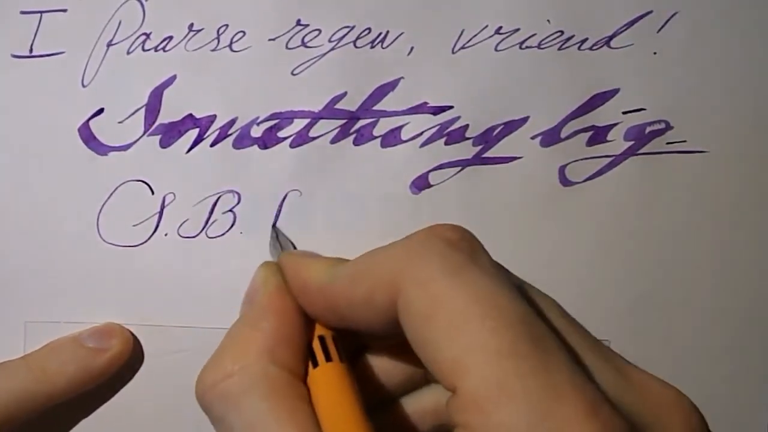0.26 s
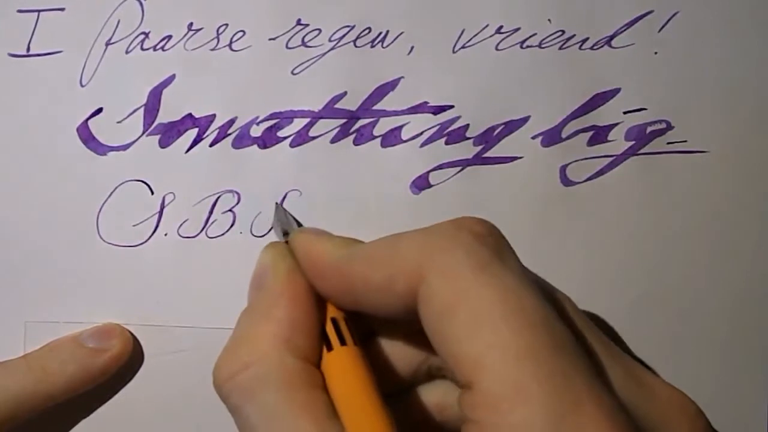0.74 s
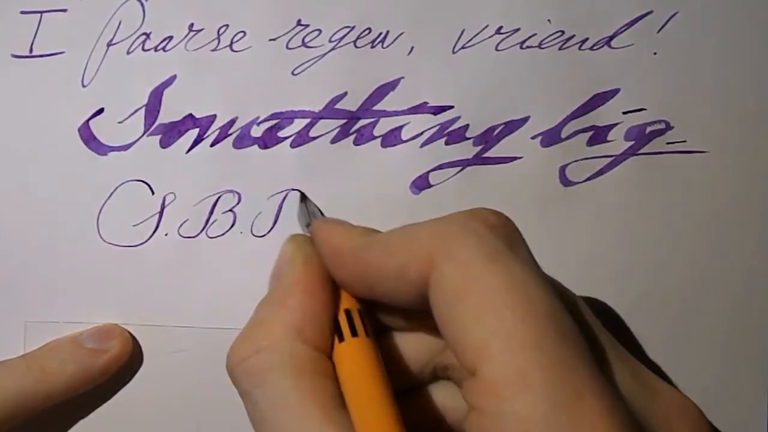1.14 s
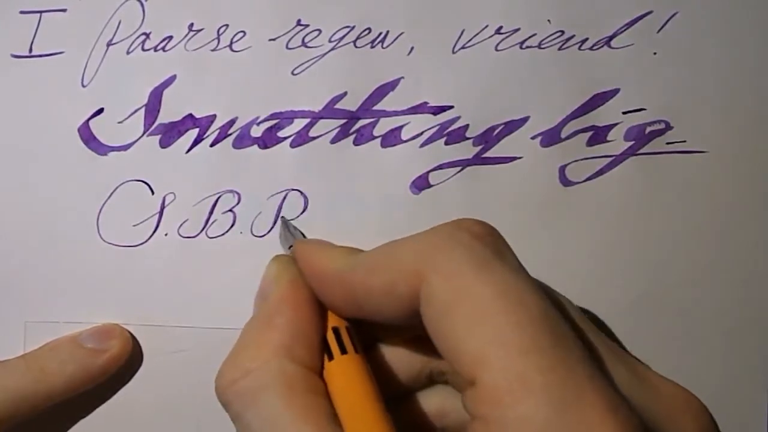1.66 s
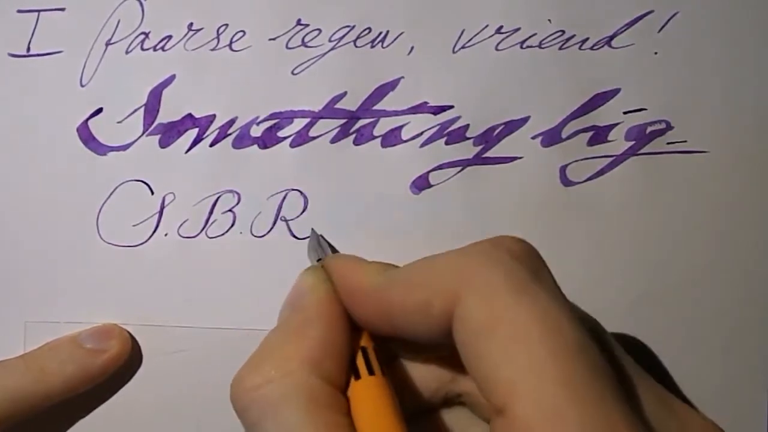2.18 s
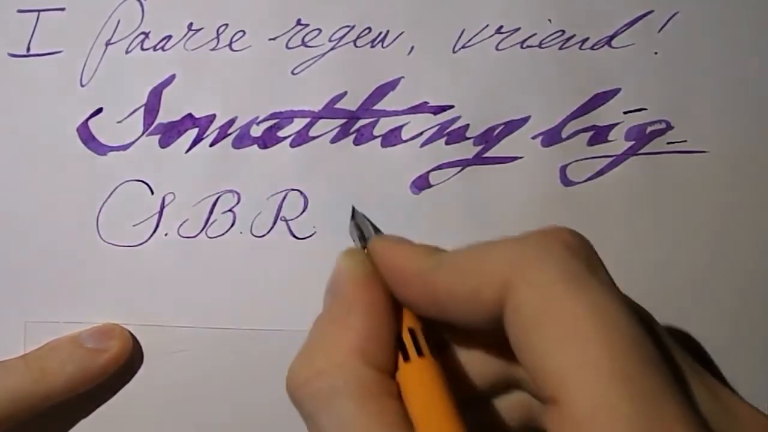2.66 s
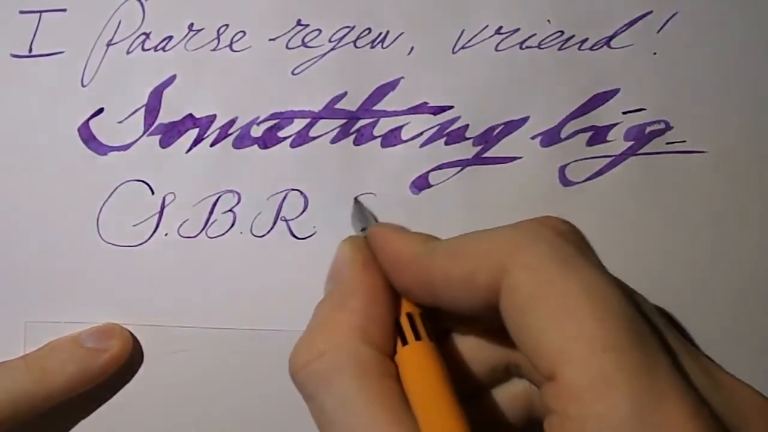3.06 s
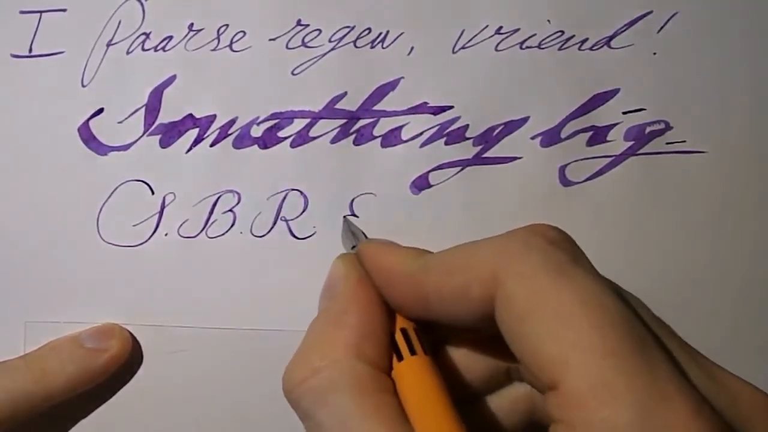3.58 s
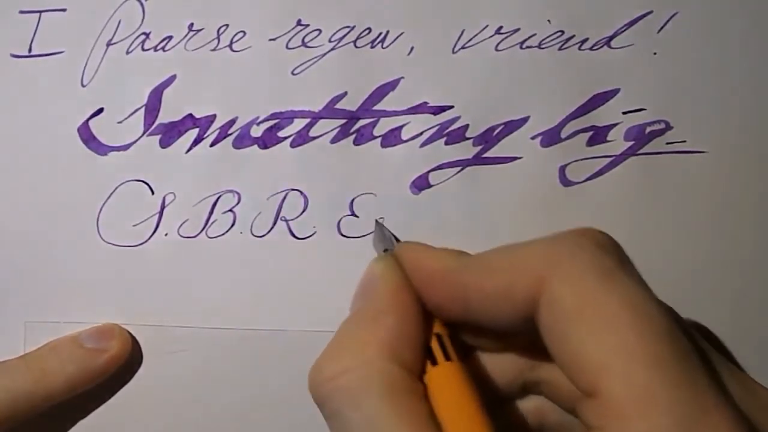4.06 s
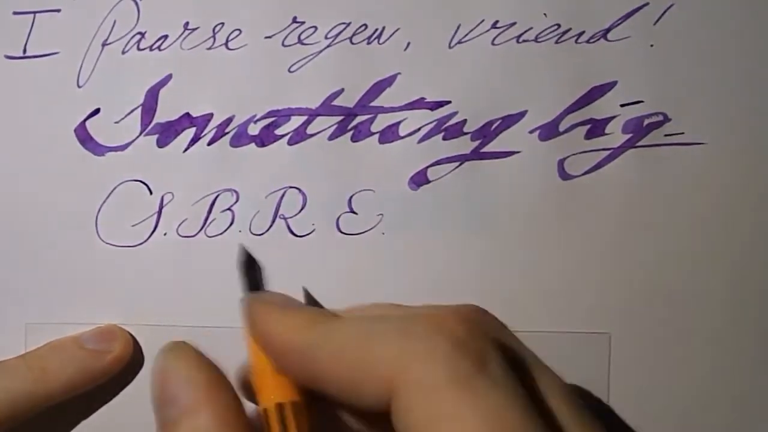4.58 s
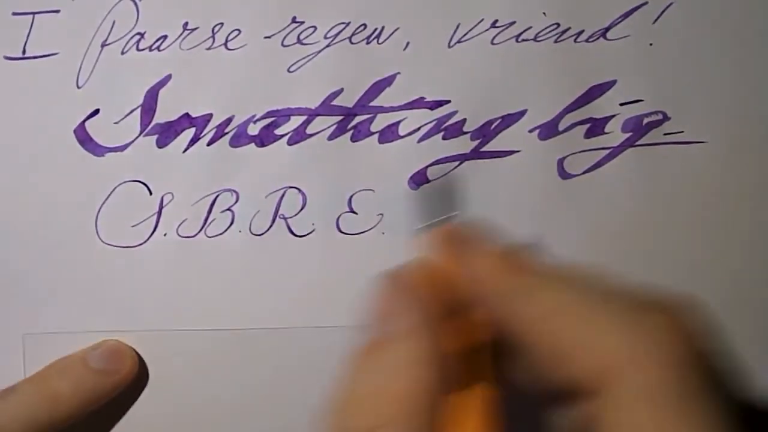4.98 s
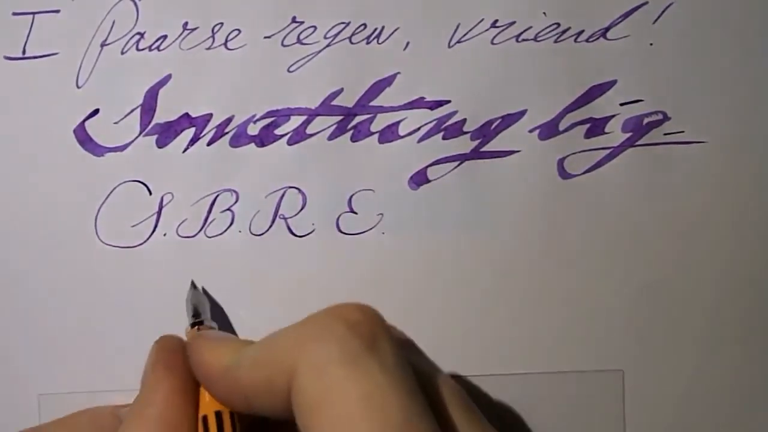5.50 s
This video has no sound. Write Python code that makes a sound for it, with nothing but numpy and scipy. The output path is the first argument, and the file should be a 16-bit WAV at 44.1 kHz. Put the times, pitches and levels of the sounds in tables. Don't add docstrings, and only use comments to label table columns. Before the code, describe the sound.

A quiet room, a small stereo microphone close to a wooden desk, with constant soft hiss, very faint mains hum and a thin high whine. From 0 to 0.6 s a steel nib scratches in overlapping strokes, with tiny ticks and a slight squeak, then a short brush. Quick scrapes return at 1.0-1.6 s and a slower one from 1.8 s, ending in a sharp, loud, woody knock at 2.07 s with a brief ring. A dull thump comes at 2.4 s among small lifting clicks, then a soft hand slide. Writing resumes at 3.0-4.1 s, light then firmer, with nib catches near 4.0. Clicks at 4.4 s lead to a strong knock at 4.57 s. Hand brushes and sheet slides with small squeaks fill 4.5-5.5 s, with a muffled bump at 5.03 s and a last dull thud at 5.57 s.

```python
import sys
import numpy as np
from scipy import signal
from scipy.fft import rfft, irfft, next_fast_len
from scipy.io import wavfile

SR = 44100
rng = np.random.default_rng(int(sys.argv[2]) if len(sys.argv) > 2 else 0)


def volts_from_db(level):
    exponent = np.asarray(level, float) / 20
    return 10 ** exponent


def int16_out(signal):
    q = np.round(np.clip(np.atleast_2d(signal).T, -1, 1) * 32767)
    wavfile.write(sys.argv[1], SR, q.astype(np.int16))


N = 253134
SIZE = next_fast_len(N + SR // 2)
HZ = np.maximum(np.arange(SIZE // 2 + 1) * SR / SIZE, 1)
SIDES = np.array([[1], [-1]])

# pitch_hz, width_hz, level_db
NIB_MODES = [(4500, 600, -2.5), (5500, 350, -1), (6000, 400, 1.5), (7200, 900, -10)]


def rms_one(x):
    return x / np.sqrt(np.mean(x ** 2) + 1e-20)


def at_hz(points, hz):
    points_hz, values = np.array(points)[:, :2].T
    return np.interp(np.log(hz), np.log(points_hz), values)


def shaped(x, gain):
    return irfft(rfft(x, SIZE) * gain, SIZE)[..., :N]


def drift(rate_hz):
    r = np.exp(-2 * np.pi * rate_hz / SR)
    wander = signal.lfilter([1], [1, -2 * r, r * r], rng.standard_normal(N + SR))
    return rms_one(wander[SR:])


def resonances(x, table):
    out = 0
    for k, (hz, width_hz, db) in enumerate(table):
        r = np.exp(-np.pi * width_hz / SR)
        poles = [1, -2 * r * np.cos(2 * np.pi * hz / SR), r * r]
        zeros = [(1 - r * r) / 2, 0, (r * r - 1) / 2]
        out = out + (-1) ** k * volts_from_db(db) * signal.lfilter(zeros, poles, x)
    return out


def pair(mid, side, alike, lean):
    c = np.clip(at_hz(alike, HZ), 0, 1)
    both = np.sqrt(1 + c) * mid + np.sqrt(1 - c) * side * SIDES
    return both * volts_from_db(at_hz(lean, HZ) / 2 * SIDES) / np.sqrt(2)


def near(x, wide):
    return rms_one(x[0] + np.clip(wide, 0, 1) * x[1] * SIDES)


def fibres(per_s, size_db, clump_db, clump_rate_hz):
    sizes = volts_from_db(size_db * np.minimum(rng.exponential(1, (2, N)), 4))
    sizes = sizes * rng.choice([-1, 1], (2, N))
    let_go = rng.random((2, N)) < per_s / SR
    return rms_one(sizes * let_go * volts_from_db(clump_db * drift(clump_rate_hz)))


def motion(rows, feeds_db):
    lightness_share = [-0.76, 0.58, 1.5, 1.5]
    roundness = 1.25
    t = np.arange(N) / SR
    coarse_t = t[::32]
    ramps = np.array([np.interp(coarse_t, row[:3], [0, 1, 0]) for row in rows])
    swells = np.sin(np.pi / 2 * ramps) ** (2 * roundness)
    db, light_db = np.transpose(rows)[3:]
    layer_db = db + np.array(feeds_db)[:, None] + np.outer(lightness_share, light_db)
    power = volts_from_db(2 * layer_db) @ swells
    return np.array([np.interp(t, coarse_t, layer) for layer in power])


def strokes(desk):
    # start_s, fastest_s, end_s, level_db, lightness_db (light fast nib brighter, pressed duller)
    pen_moves = [(-.06, .08, 0.23, -59.5, 0), (.18, .27, 0.51, -62.5, 0.5), (.40, .45, 0.48, -56.5, 0),
                 (.46, .51, .57, -61, 0.5), (1.01, 1.07, 1.13, -53, 1), (1.08, 1.175, 1.2, -56.5, 0.5),
                 (1.18, 1.23, 1.35, -65, 1.5), (1.39, 1.465, 1.58, -55.5, -1.5),
                 (1.46, 1.51, 1.56, -63.5, 3.5), (1.51, 1.6, 1.61, -60.5, 1), (1.76, 1.9, 2.1, -64.5, 0),
                 (1.92, 2.022, 2.06, -52, 0.5), (2.46, 2.49, 2.57, -66.5, 4.5),
                 (2.97, 3.045, 3.14, -57.5, 0.5), (3.07, 3.11, 3.16, -59, 1.5), (3.13, 3.2, 3.64, -70, 2),
                 (3.29, 3.35, 3.23, -59.5, 6), (3.48, 3.6, 3.66, -64.5, -0.5),
                 (3.65, 3.71, 3.9, -63.5, -2.5), (3.81, 3.91, 3.89, -58.5, -2.5),
                 (3.88, 3.965, 4.04, -52.5, 3), (3.97, 4.03, 4.09, -55, 2)]
    # start_s, fastest_s, end_s, level_db, lightness_db
    hand_moves = [
        (.55, .6, .645, -56.5, 2),
        (.66, .85, 1.2, -88, -3),
        (2.5, 2.66, 2.87, -70.5, -2),
        (4.08, 4.15, 5.5, -82, -5),
        (4.46, 4.53, 4.92, -58.5, 0),
        (4.69, 4.73, 4.6, -61, 1),
        (4.8, 4.96, 5.2, -65.5, -0.5),
        (5.07, 5.13, 5.29, -62, 1.5),
        (5.26, 5.37, 5.54, -65.5, 7.5),
        (5.62, 5.68, 5.7, -62, -6.5),
    ]
    nib_feeds_db = [0.5, 0, -5.5, -7.5]
    hand_feeds_db = [-1.9, -8, -10.5, -6]
    # pitch_hz, width_hz, level_db
    barrel_modes = [(1230, 1380, -1), (1800, 895, 8.5), (2150, 1110, 2)]
    # pitch_hz, width_hz, level_db over the rumble
    boom = [(230, 190, -7.5)]
    flutter_db, flutter_rate_hz = 1.2, 10
    flutter = volts_from_db(flutter_db * np.array([drift(flutter_rate_hz) for layer in nib_feeds_db]))
    power = motion(pen_moves, nib_feeds_db) + motion(hand_moves, hand_feeds_db)
    rumble, barrel, grit, hiss = flutter * np.sqrt(power)

    slips = fibres(per_s=6000, size_db=3.0, clump_db=2.4, clump_rate_hz=70)
    fine = fibres(per_s=8000, size_db=2.8, clump_db=2.4, clump_rate_hz=80)
    dull = signal.sosfilt(signal.butter(2, 1300, fs=SR, output="sos"), slips[0])
    through_desk = shaped(rumble * dull, desk) / np.std(shaped(dull, desk))
    body = near(resonances(resonances(slips, boom), boom), wide=0.61)
    through_desk = through_desk + rumble * volts_from_db(boom[0][2]) * body
    ring = near(resonances(slips, barrel_modes), wide=0.34)
    scratch = near(resonances(resonances(fine, NIB_MODES), [(4940, 2000, 0)]), wide=0.57)
    air = signal.sosfilt(signal.butter(2, [7800, 13500], "band", fs=SR, output="sos"), fine)
    return through_desk + barrel * ring + grit * scratch + hiss * near(air, wide=0.95)


def ticks():
    # start_s, ring_db, ring_hz, grit_db over ring
    catches = [(0.083, -41, 1850, -11), (0.2107, -46, 1640, 1.5), (0.2787, -40.5, 1630, -16),
               (0.325, -44, 1610, -16), (0.389, -37, 1590, -2), (0.395, -36, 1560, -8),
               (0.443, -47, 1620, -14), (0.473, -48, 1870, -13), (1.0945, -46, 1740, -1),
               (1.1521, -43, 1800, 5), (1.1764, -56, 1810, -1), (1.481, -48.5, 2100, 8),
               (2.0206, -39.5, 1610, 8.5), (2.9058, -46, 2250, -9), (3.113, -46, 1920, -5),
               (3.941, -49, 2225, -5), (3.966, -40, 1860, -6), (3.985, -46, 1630, 7),
               (4.0233, -35.5, 1610, -23), (5.02, -46, 1820, -25), (5.0985, -45, 1730, -11)]
    # start_s, ring_db, ring_hz, snap_db over ring, length_ms
    lifts = [(2.3376, -56.5, 1800, 20.5, 1.3), (2.3418, -38.5, 1680, -12, 3),
             (2.4398, -39.5, 1980, -10, 3.1), (2.486, -44.5, 2680, -12, 3.8), (3.709, -49, 1600, -8, 3.4),
             (4.3723, -43.5, 2130, 6, 1.5), (4.3742, -35, 2090, -7, 2.6), (4.4477, -48, 1660, 12, 1.8),
             (4.501, -52, 1930, 12, 2.8), (4.5286, -45, 1800, 5, 3.6), (4.5318, -43, 1800, 4, 3.4),
             (4.7232, -46, 1860, 0, 8.4)]
    catch_snap_db, catch_ms = -44, 3.6
    lift_grit_db, grit_per_snap = 1.5, 0.42
    rows = [(*row, catch_snap_db, catch_ms) for row in catches]
    for s, db, hz, snap_db, ms in lifts:
        rows.append((s, db, hz, lift_grit_db + grit_per_snap * snap_db, snap_db, ms))

    out, t = np.zeros((2, N)), np.arange(SR // 25) / SR
    slips = rng.standard_normal((len(rows), 3, 2, len(t))) ** 3
    slips[:, 1:, 0, 0] = 14
    high = signal.butter(3, 7500, "high", fs=SR, output="sos")
    for (s, db, hz, grit_db, snap_db, ms), draw in zip(rows, slips):
        body, nib, air = draw * np.exp(-(t * 1000 / max(ms, .4)) ** 2) + 1e-18
        ring = resonances(body, [(hz, 520, 0)])
        grit = resonances(nib, NIB_MODES) + resonances(nib, [(4100, 4200, 13.0)])
        snap = signal.sosfilt(high, air)
        sound = 0
        for part, over_db in [(ring, -1.5), (grit, grit_db), (snap, snap_db)]:
            sound = sound + volts_from_db(db + over_db) * part / np.abs(part[0]).max()
        i = round(s * SR)
        out[:, i:i + len(t)] += sound[0] + 0.31 * sound[1] * SIDES
    return out


def squeaks():
    # start_s, end_s, pitch_hz, width_hz, level_db
    squeak_moments = [
        (0.472, 0.511, 1490, 90, -59.5),
        (0.599, 0.63, 2920, 90, -60.5),
        (0.565, 0.634, 1880, 1290, -59),
        (1.05, 1.161, 1870, 200, -66),
        (1.593, 1.628, 1080, 150, -59),
        (3.035, 3.123, 1800, 220, -60),
        (4.711, 4.76, 1810, 160, -55.5),
        (5.102, 5.114, 1800, 120, -53.5),
                      (.1, .42, 175, 40, -76),
        (2.5, 2.95, 205, 25, -76),
        (.04, .18, 1860, 60, -60),
        (4.815, 4.885, 1820, 110, -63),
        (5.185, 5.345, 1760, 200, -61),
        (5.33, 5.54, 1730, 170, -64.5),
    ]
    out, broken = np.zeros((2, N)), volts_from_db(2.2 * drift(25))
    for start, end, hz, width_hz, db in squeak_moments:
        i, j = round(start * SR), round(end * SR)
        ringing = resonances(rng.standard_normal((2, SR // 2)), [(hz, width_hz, 0)])[:, i - j:]
        fade = signal.windows.tukey(j - i, .4)
        out[:, i:j] += volts_from_db(db) * near(ringing, wide=0.37) * fade * broken[i:j]
    return out


def knock_forces():
    # start_s, peak_db, contact_sharpness_hz
    knocks = [(0.279, -40, 1500), (0.325, -44.5, 2000), (0.387, -38, 1800), (2.0704, -13.5, 9000),
              (2.342, -48, 1500), (2.392, -21.5, 406), (2.4398, -41.5, 700), (4.373, -45, 2000),
              (4.5704, -15.5, 3020), (5.03, -20.5, 700), (5.5723, -22, 360)]
    out = np.zeros(N)
    for s, db, hz in knocks:
        click = np.full(SR // 20, 1e-18)
        click[0] = volts_from_db(db)
        i = round(s * SR)
        force = signal.sosfilt(signal.butter(2, hz, fs=SR, output="sos"), click)
        out[i:i + len(click)] += force[:N - i]
    return out


def desk_modes(t):
    # pitch_hz, level_db, t60_s, swing (+1 or -1: nib and microphone together or apart)
    modes_table = [(210, -16.5, .13, -1), (282, -12, .22, -1), (314, -14, .25, 1), (348, -9, .11, 1),
                   (392, -12, .24, 1), (420, -20, .25, 1), (442, -6, .14, -1), (478, 0, .13, -1),
                   (517, -3, .1, -1), (540, -17, .12, -1), (585, -2, .1, 1), (619, -11, .22, 1),
                   (650, -2, .05, -1), (682, -3.5, .08, 1), (772, -16, .165, -1), (845, -12, .1, 1),
                   (885, 0, .04, 1), (932, -5, .11, 1), (972, -16, .17, -1), (1030, -11, .04, -1),
                   (1100, -13, .07, 1), (1260, -5, .03, 1), (1345, -1.5, .03, -1), (1452, -14, .08, 1),
                   (1520, 4, .045, 1), (1700, 0, .04, -1), (1810, -6, .06, 1), (1900, -9, .06, 1)]
    rebound_s, rebound_db, rebound_hz = .0375, -11, 420
    damp_s, damp_db, damp_edge_s = .056, -8, 0.0026
    hz, db, t60_s, swing = np.transpose(modes_table)[:, :, None]
    rings = swing * volts_from_db(db - 60 * t / t60_s) * np.sin(2 * np.pi * hz * t)
    ahead = np.gradient(rings / (2 * np.pi * hz / SR), axis=1).sum(axis=0) * t / (t + 0.001)
    modes = np.array([rings.sum(axis=0), ahead])
    lag = round(rebound_s * SR)
    late = np.pad(modes, [(0, 0), (lag, 0)])[:, :len(t)]
    modes = modes + volts_from_db(rebound_db) * signal.lfilter(*signal.butter(3, rebound_hz, fs=SR), late)
    return modes * volts_from_db(damp_db / (1 + np.exp(-(t - damp_s) / damp_edge_s)))


def desk_tail(t, tail_db):
    # pitch_hz, level_db per Hz
    tail_level = [(130, -28), (200, -8), (300, -5), (600, 3), (1000, 5), (1500, -2), (2200, -11.5),
                  (3000, -17.5), (4300, -1.5), (5500, -32), (9000, -27)]
    # pitch_hz, t60_s
    tail_t60 = [(180, 0.14), (1000, 0.22), (2800, 0.22), (7000, 0.2)]
    tail = 0
    for low_hz in 125 * 2 ** np.arange(0, 6.5, .5):
        band = signal.butter(2, [low_hz, low_hz * np.sqrt(2)], "band", fs=SR, output="sos")
        decay = volts_from_db(-60 * t / max(at_hz(tail_t60, low_hz), .02))
        noise = signal.sosfilt(band, rng.standard_normal((2, len(t))) * decay)
        tail = tail + volts_from_db(tail_db + at_hz(tail_level, low_hz * 1.224)) * noise
    return tail


def desk_response(front_db, tail_db):
    # pitch_hz, width_hz, level_db
    front = [(2300, 460, -9.5), (3220, 350, -12), (3804, 100, -0.5), (4350, 71, 4.5), (5450, 500, -16),
             (6960, 550, -28)]
    # pitch_hz, left-right likeness 0-1
    desk_alike = [(200, 0.84), (1000, 0.94), (2500, 0.95), (8000, 0)]
    # pitch_hz, left minus right db
    desk_lean = [(600, 2.3), (1200, .6), (5000, .6)]
    mic_low_hz, bend_stages, bend_corner_hz, wood_lag_s = 190, 6, 400, .0005
    t = np.arange(SR // 2) / SR
    modes = desk_modes(t)
    tail = desk_tail(t, tail_db)
    rattle = rng.standard_normal(len(t)) * np.exp(-t / 0.0022) / 5 + 1e-18
    crack = volts_from_db(front_db) * resonances(rattle, front)
    side_lag = np.exp(-2j * np.pi * HZ * np.array([[0], [.0003]]))
    w, r = 2 * np.pi * HZ / SR, np.exp(-2 * np.pi * bend_corner_hz / SR)
    stage_phase = w + 2 * np.arctan2(r * np.sin(w), 1 - r * np.cos(w))
    bending = np.exp(-1j * (bend_stages * stage_phase + w * SR * wood_lag_s))
    low_cut = signal.butter(4, mic_low_hz, "high", fs=SR, output="sos")
    both = rfft(signal.sosfilt(low_cut, modes), SIZE) * bending
    both = both + rfft(crack, SIZE) * side_lag + rfft(tail, SIZE)
    both = pair(*both, desk_alike, desk_lean)
    return both / np.abs(irfft(both.mean(axis=0), SIZE)).max()


def background():
    # pitch_hz, level_db per Hz
    hiss_level = [(25, -25), (60, -33), (100, -21), (150, -15), (200, -7.5), (290, -1), (470, 0.5),
                  (770, -2.5), (1220, -4), (2590, -9.5), (6000, -13.5), (12000, -15.5), (15800, -19)]
    # pitch_hz, left-right likeness 0-1
    hiss_alike = [(100, 0), (400, 0.02), (1500, 0.07), (4000, 0.04), (12000, 0)]
    # pitch_hz, left minus right db
    hiss_lean = [(60, 6), (240, 3), (950, 1), (3770, 1), (15000, 1)]
    # pitch_hz, rms_db, left minus right db, wander_hz
    tones = [
        (120, -83.5, 1.1, .5),
        (11720.6, -75.0, 4.0, 3.0),
    ]
    hiss_db = -58.5
    mid, side = rfft(rng.standard_normal((2, SIZE))) * volts_from_db(at_hz(hiss_level, HZ))
    hiss = irfft(pair(mid, side, hiss_alike, hiss_lean), SIZE)[:, :N]
    out = volts_from_db(hiss_db) * hiss / np.std(hiss.mean(axis=0))
    for hz, db, lean_db, wander_hz in tones:
        turns = np.cumsum(hz + wander_hz * drift(2.37)) / SR
        out += np.sqrt(2) * volts_from_db(db + lean_db / 2 * SIDES) * np.sin(2 * np.pi * turns)
    return out


def scene():
    desk = desk_response(front_db=37.0, tail_db=6.0)
    knocks = shaped(knock_forces(), desk)
    return strokes(desk) + ticks() + squeaks() + knocks + background()


def roll_off(x):
    return signal.sosfilt(signal.butter(12, 15910, fs=SR, output="sos"), x)


def record(dry):
    cutoff_hz = 15850
    cut = signal.sosfilt(signal.ellip(16, .5, 80, cutoff_hz, fs=SR, output="sos"), dry)
    return roll_off(cut)


dry = scene()
out = record(dry)
int16_out(out)
```